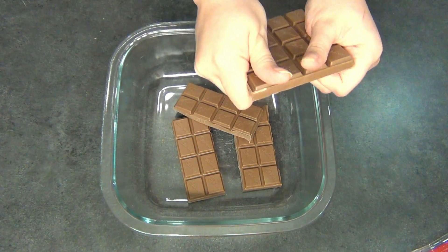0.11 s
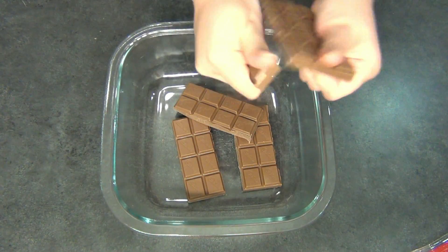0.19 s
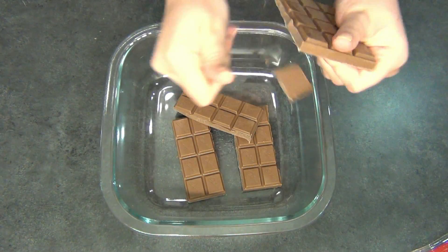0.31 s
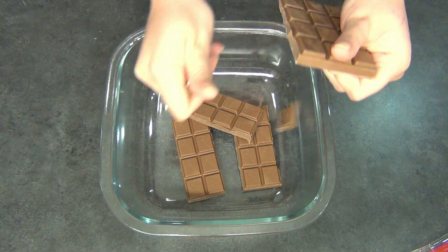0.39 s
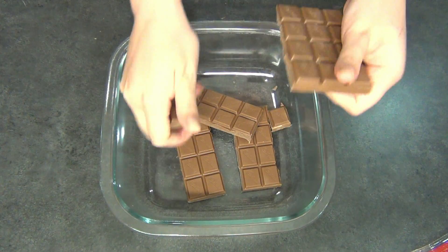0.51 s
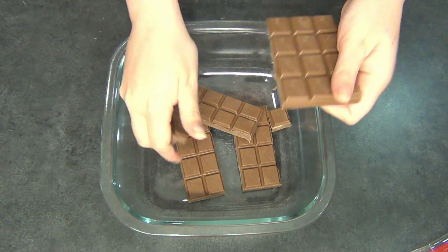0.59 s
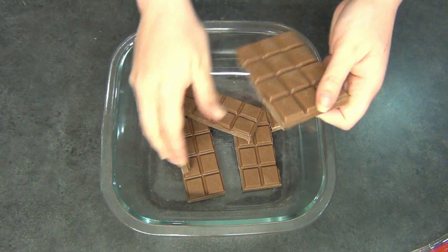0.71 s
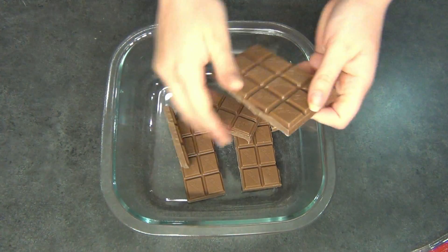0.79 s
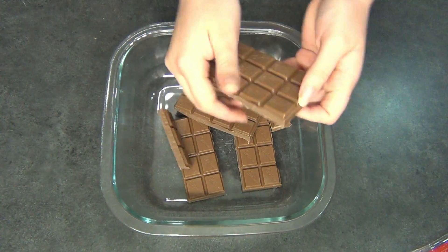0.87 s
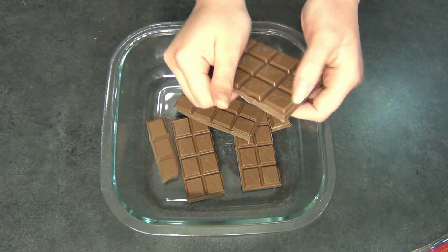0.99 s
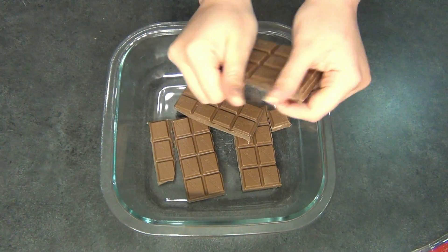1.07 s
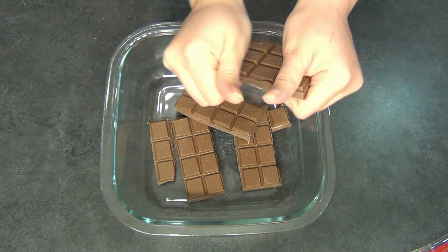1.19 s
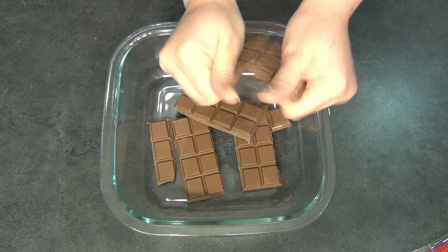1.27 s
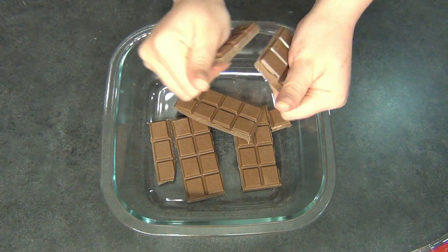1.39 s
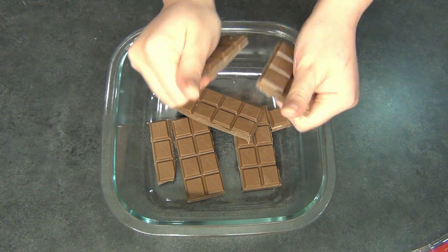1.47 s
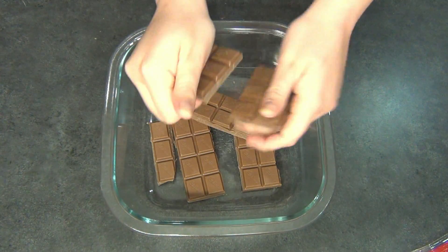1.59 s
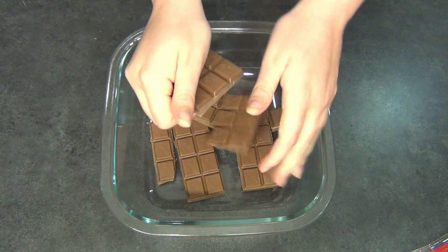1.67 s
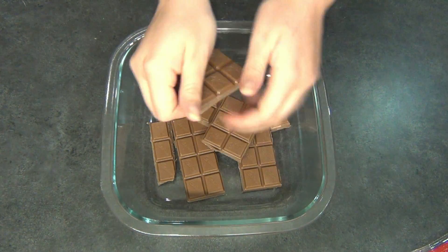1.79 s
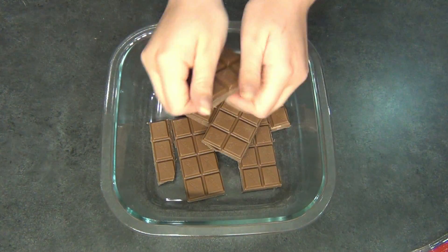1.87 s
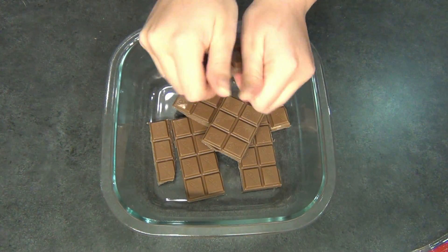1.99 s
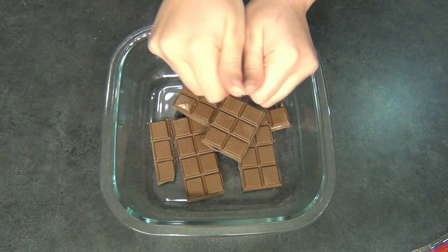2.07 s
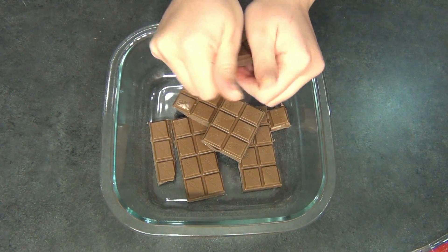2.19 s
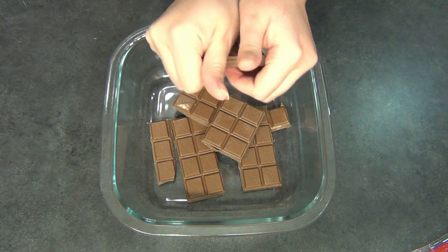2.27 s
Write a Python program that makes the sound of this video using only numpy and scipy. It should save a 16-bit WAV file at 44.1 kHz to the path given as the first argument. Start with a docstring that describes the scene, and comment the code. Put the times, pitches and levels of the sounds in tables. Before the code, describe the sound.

Chocolate snaps sharply by hand and pieces clatter into a glass dish.

```python
"""A kitchen counter, microphone close to a glass dish, hands snapping a chocolate bar above it.
Each break is a dry crack of a few milliseconds. The pieces drop, clatter, ring the glass and
slide to rest; crumbs tick, and the dish rocks and thumps on the counter. Further off, the hard
walls answer over soft room noise and a faint appliance hum."""
import sys
import numpy as np
from scipy import signal
from scipy.fft import rfft, irfft
from scipy.io import wavfile

SR = 44100
rng = np.random.default_rng(int(sys.argv[2]) if len(sys.argv) > 2 else 0)


def transcribe(u):
    """Save the signal u as a 16-bit wav file named by the first command-line argument.

    u: samples, shape (n,) or (channels, n), limited to [-1, 1]; the rate is SR.
    q: integer samples, one column per channel.
    """
    v = np.clip(np.atleast_2d(u).T, -1, 1)
    q = np.round(v * 32767).astype(np.int16)
    wavfile.write(sys.argv[1], SR, q)


N = 101430

# spectrum of the room noise: frequency_hz, relative_density_db
ROOM_TONE = [(25, -26), (50, -10), (100, -4.5), (180, -8), (320, 0), (500, -1.5), (1000, -8), (2000, -16.5),
             (4000, -19.5), (9000, -21), (16000, -16)]
# appliance hum: pitch_hz, level_db
HUM_TONES = [(100, -62.5), (170, -57), (200, -57.5), (303, -61.5)]
# kitchen reverberation by band: band_hz, level_db, t60_s, side_to_mid_db
REVERB_BANDS = [(101, -7.5, 1, -22), (262, 0.5, 0.63, -18), (726, 2.5, 0.92, -11), (1610, -1, 0.98, -11.5),
                (2780, -2.5, 0.69, -9.5), (4800, -5.5, 0.72, -6), (9200, -7.5, 0.58, -7.5),
                (14600, -14, 0.3, -50)]
# the dish rocking on the counter: start_s, level_db, pitch_hz, relative_boom_db
DISH_THUMPS = [(0.497, -25, 236, -17), (0.719, -29, 250, -40), (0.753, -18.5, 229, -19.5),
               (.772, -20, 210, -28), (.815, -22.5, 262, -41), (.859, -19, 221, -20),
               (.912, -28.5, 197, -40), (.96, -25, 208, -23), (1.02, -31, 264, -44),
               (1.071, -28.5, 223, -44), (1.107, -22.5, 202, -17), (1.145, -20.5, 236, -22),
               (1.191, -36, 284, -30), (1.759, -16, 210, -15.5), (1.794, -16, 200.5, -18.5),
               (1.838, -16.5, 228.5, -17.5)]
# crumbs and light touches: start_s, level_db, band_hz
CRUMB_TICKS = [(.304, 4.5, 2600), (.869, -13.5, 9000), (.921, -14, 8000), (.928, 0.5, 2180),
               (1.0005, -21.5, 11160), (1.137, -7, 6000), (1.147, -7.5, 6000), (2.013, -15, 12200)]
# pieces sliding to rest: start_s, fade_s, level_db, centre_hz
PIECE_SLIDES = [(.772, .13, -28.5, 3060), (1.815, 0.097, -26.5, 4520)]
# points at which the strength of each knock and snap is set: frequency_hz
STRENGTH_HZ = [500, 1000, 1600, 3000, 4700, 9000, 14000]
# modes of the glass dish: pitch_hz, damped_db, damped_t60_s, free_db, free_t60_s
DISH_MODES = [(833.3, -45, 0.016, -32, 0.42), (1513, -32, 0.025, -80, 0.57),
              (1614, -43.5, 0.076, -51, 0.38), (1733, -36.5, 0.028, -72, 0.37),
              (2348, -46.5, 0.098, -43.5, 0.23), (2857.3, -29.5, 0.024, -40, 0.51),
              (3058, -36, 0.046, -53, .4), (3918, -30.5, 0.034, -36.5, 0.13), (4515, -36, 0.055, -53, 0.3),
              (5100, -38.5, 0.083, -45.5, 0.37), (5620, -39.5, 0.024, -42.5, 0.31),
              (6150, -46, 0.15, -56, .4), (6620, -44, 0.036, -65, .33), (8550, -36.5, 0.069, -46, 0.23)]
# pieces hitting the dish and each other:
# start_s, free_ring_db, room_db, lead_hz, lead_db, then strength_db at each STRENGTH_HZ
PIECE_KNOCKS = [ (0.4677, -6, -2.5, 2365, -26, 6, 6, 18.8, 7.5, 9.5, -6, -13),
                (0.4772, -0.5, 1, 3960, -27, 2, -1.5, 2.7, 15, 15, 2.5, 6.5),
                (.5075, -16, -11, 3980, -24, 6, 4.5, 7, 8.5, 8, -2, -4),
                (.7350, -30, -6, 1635, -30.5, 10.5, 2, 14.2, 8, 8.5, -15, -18),
                (.7550, -25, 0.5, 1600, -40, 11.5, 5.5, 15, 16.5, 9, -3, -10),
                (0.7623, -22, -7, 4130, -17, 3, 11, -11, 14, 2, 8, -34),
                (.7668, -25, 0.5, 3180, -28, 10.5, 9.5, 16.6, 17, 9, 7.5, -3.5),
                (0.8576, -31, -2.5, 3980, -31.5, 15, 9, 13, 18.5, 11, -0.5, -26),
                (1.0945, -18.5, -3.5, 4950, -33, 13, 5.5, 15.3, 17, 11.5, 6.5, -10),
                (1.1295, -26, -17, 1670, -34, 6, -1, 11.6, -4.5, 1, -16, -18),
                (1.7581, -42, -1.5, 1554, -32, 15, 6, 17.9, 10.5, 6.5, 5.5, -2),
                (1.7621, -38, 0, 710, -37, 14.5, 1, 14, 12, 13.5, -6, -17),
                (1.7663, -42, -4.5, 487, -49, 11, 1, 20.1, 3.5, 0, 2, -14),
                (1.8079, -36, -2, 4400, -38, 3, -11, 1, 4, 12, -18, -13),
                (1.8122, -36, -6, 1670, -37, 1, 0, 6.6, 16, 14, -28, -19),
                (1.8225, -36, 4, 3400, -32, 8, 8, 9, 7, 11, 5.5, -9)]
# breaks of the bar:
# start_s, room_db, pan_db, counter_lag_s, ring_hz, ring_db, then strength_db at each STRENGTH_HZ
BAR_SNAPS = [(0.2403, 6, -1.5, .0014, 1430, -38.5, -5, 2, 10.5, 1.9, 4.9, 9.8, 9.4),
             (1.3629, -3.5, -1.4, .00115, 2590, -26, 8, 7, 9, 10.2, 7.5, 9.8, 10.7),
             (1.7874, 9, 1, .00065, 4950, -28, -10, -23, -3, 6.5, 10.7, 9.7, 3.4)]

TIME_S = np.arange(N) / SR
SIDE = np.array([[1], [-1]])  # left, right


def undb(db):
    """Decibels to gain."""
    return 10 ** (np.asarray(db) / 20)


def curve(hz, values, size=N):
    """Points joined on a log-frequency axis, for every bin of a spectrum."""
    return np.interp(np.log(np.fft.rfftfreq(size, 1 / SR) + 1), np.log(hz), values)


def bandpass(x, low_hz, high_hz):
    """Keep one band, with gentle slopes."""
    return signal.sosfilt(signal.butter(2, [low_hz, high_hz], "band", fs=SR, output="sos"), x)


def colour(x, strength_db, size=32768):
    """Causal filter with the given gains at STRENGTH_HZ, falling away in the bass."""
    bass_cut = np.minimum(np.fft.rfftfreq(size, 1 / SR) / 160 + 0.017, 1) ** 2
    cepstrum = irfft(np.log(undb(curve(STRENGTH_HZ, strength_db, size)) * bass_cut))
    cepstrum[1:size // 2] *= 2  # fold to minimum phase: nothing sounds ahead of the hit
    cepstrum[size // 2 + 1:] = 0
    impulse = irfft(np.exp(rfft(cepstrum)))[:size // 8]
    return signal.fftconvolve(x, impulse)[:len(x)]


def burst(rise_s, decay_s, size=4096):
    """Dense micro-cracks that swell and die away, even in spectrum and of unit energy."""
    t = TIME_S[:size]
    envelope = (1 - np.exp(-t / rise_s)) * np.exp(-t / decay_s)
    x = np.sign(rng.standard_normal(size)) * envelope
    for _ in range(2):  # flatten the spectrum, then restore the fade
        spectrum = rfft(x)
        x = irfft(spectrum / (np.abs(spectrum) + 1e-12)) * np.sqrt(envelope)
    return np.pad(x / np.sqrt(np.sum(x ** 2)), (0, N - size))


def ring(hz, db, t60_s, wave=np.sin):
    """One struck resonance."""
    t = TIME_S[:int(t60_s * 1.2 * SR)]
    tone = undb(db) * np.exp(-np.log(1000) * t / t60_s) * wave(2 * np.pi * hz * t)
    return np.pad(tone, (0, N - len(t)))


def pan(x, db):
    """Place a sound with the left louder than the right by db."""
    return x * undb(SIDE * db / 2)


def add(bus, x, start_s, pan_db, room_db):
    """Mix a sound into left, right and the feed to the room."""
    i = int(start_s * SR)
    bus[:2, i:] += pan(x[:N - i], pan_db)
    bus[2, i:] += x[:N - i] * undb(room_db)


def room_tone(air_db=-51.5, side_db=-15.5):
    """Soft room noise behind everything, with a faint appliance hum."""
    mid, side = irfft(rfft(rng.standard_normal((2, N))) * undb(curve(*np.array(ROOM_TONE).T)), N)
    air = undb(air_db) * (mid + undb(side_db) * side * SIDE) / mid.std()
    hum = sum(undb(db) * np.sin(2 * np.pi * (hz * TIME_S + rng.random())) for hz, db in HUM_TONES)
    return air + hum


def kitchen_walls(feed, delay_s=0.004, build_s=0.0046):
    """Diffuse reflections build up and fade, the treble first; the bass is alike on both sides."""
    t = np.maximum(TIME_S - delay_s, 0)
    bands_hz = [row[0] for row in REVERB_BANDS]
    noise = rfft(rng.standard_normal((2, N)))
    response = 0
    for share, (_, db, t60_s, side_db) in zip(np.eye(len(bands_hz)), REVERB_BANDS):
        envelope = (1 - np.exp(-t / build_s)) * np.exp(-np.log(1000) * t / t60_s)
        envelope /= np.sqrt(np.sum(envelope ** 2))
        mid, side = irfft(noise * curve(bands_hz, share), N)
        response += undb(db) * envelope * (mid + undb(side_db) * side * SIDE)
    return pan(signal.fftconvolve(feed[None], response, axes=1)[:, :N], db=0.3)


def dish_thumps(rise_s=0.0052, decay_s=0.0047, counter_hz=95, counter_decay_s=0.048):
    """The dish bumps the counter: a few low cycles, the worktop's boom and a little rumble."""
    bus = np.zeros((3, N))
    attack = 1 - np.exp(-TIME_S / rise_s)
    bump_shape = attack ** 2 * np.exp(-TIME_S / decay_s)
    boom_shape = attack * np.exp(-TIME_S / counter_decay_s)
    for start_s, db, hz, boom_db in DISH_THUMPS:
        bump = bump_shape / bump_shape.max() * np.sin(2 * np.pi * hz * TIME_S)
        rumble = bandpass(rng.standard_normal(N), 150, 600)
        boom = np.sin(2 * np.pi * counter_hz * TIME_S) + undb(3.5) * rumble / rumble.std()
        thump = bump + undb(boom_db) * boom_shape * boom
        add(bus, undb(db) * thump, start_s, pan_db=3.5, room_db=-1.5)
    return bus


def crumb_ticks():
    """Crumbs land and edges graze each other, with a faint rattle."""
    bus = np.zeros((3, N))
    for start_s, db, hz in CRUMB_TICKS:
        touch = burst(rise_s=0.00072, decay_s=0.00061)
        rattle = undb(-5) * burst(rise_s=0.003, decay_s=0.0047)
        tick = bandpass(touch + rattle, hz / 1.8, hz * 1.28)
        add(bus, undb(db) * tick, start_s, pan_db=0, room_db=4.5)
    return bus


def piece_slides(catches_per_s=610, band_ratio=1.144):
    """Tiny catches of chocolate on glass, fading as the piece settles."""
    bus = np.zeros((3, N))
    for start_s, fade_s, db, hz in PIECE_SLIDES:
        catches = (rng.random(N) < catches_per_s / SR) * rng.standard_normal(N)
        scrape = bandpass(catches, hz / band_ratio, hz * band_ratio)
        slide = scrape / scrape.std() * np.exp(-TIME_S / fade_s)
        add(bus, undb(db) * slide, start_s, pan_db=0, room_db=-0.5)
    return bus


def piece_knocks(high_count=14, high_span_hz=(5640, 14320), detune=0.01244, scatter_db=2.5):
    """Pieces strike the glass: its modes are mostly damped and detuned by chocolate, partly free."""
    bus = np.zeros((3, N))
    high_hz = np.interp(np.arange(high_count) + rng.random(high_count), [0, high_count], high_span_hz)
    modes = list(DISH_MODES) + [(hz, -41, 0.067, -51, 0.36) for hz in high_hz]
    free = sum((-1) ** k * ring(hz, db, t60_s) for k, (hz, _, _, db, t60_s) in enumerate(modes))
    for start_s, free_ring_db, room_db, lead_hz, lead_db, *strength_db in PIECE_KNOCKS:
        pitch_draw, level_draw = rng.standard_normal((len(modes), 2)).T
        damped = 0
        for k, (hz, db, t60_s, _, _) in enumerate(modes):
            loaded_hz = hz * (1 + detune * pitch_draw[k])
            damped += (-1) ** k * ring(loaded_hz, db + scatter_db * level_draw[k], t60_s)
        lead = ring(lead_hz, lead_db, t60_s=0.035, wave=np.cos)  # this knock's leading resonance
        contact = undb(-4) * burst(rise_s=0.0001, decay_s=0.0012)
        rattle = undb(-10.5) * burst(rise_s=0.0018, decay_s=0.0096)
        knock = contact + rattle + lead + damped + undb(free_ring_db) * free
        add(bus, colour(knock, strength_db), start_s, pan_db=1, room_db=room_db)
    return bus


def bar_snaps(reflection_db=-6):
    """A fracture crosses the bar in about 3 ms; the halves ring and the counter mirrors the crack."""
    bus = np.zeros((3, N))
    for start_s, room_db, pan_db, counter_lag_s, ring_hz, ring_db, *strength_db in BAR_SNAPS:
        crack = burst(rise_s=0.00013, decay_s=0.0025)
        reflection = undb(reflection_db) * np.roll(crack, int(counter_lag_s * SR))
        halves = ring(ring_hz, ring_db, t60_s=0.019)
        add(bus, colour(crack + reflection + halves, strength_db), start_s, pan_db, room_db)
    return bus


def microphone_pair(x, lag_s=3e-6):
    """Close sound reaches the left microphone a few microseconds before the right."""
    phase = np.pi * np.fft.rfftfreq(N, 1 / SR) * lag_s * SIDE
    return irfft(rfft(x) * np.exp(1j * phase), N)


def scene():
    """Chocolate and dish up close, the walls further off, room tone behind."""
    bus = bar_snaps() + piece_knocks() + piece_slides() + crumb_ticks() + dish_thumps()
    return microphone_pair(bus[:2]) + kitchen_walls(bus[2]) + room_tone()


def record(dry):
    """The recorder rounds the highest peaks, softens the highest treble and cuts the top."""
    ceiling, roll_off_hz, top_hz = 0.72, 13900, 16200
    rounded = ceiling * np.tanh(dry / ceiling)
    softened = signal.sosfilt(signal.butter(3, roll_off_hz, fs=SR, output="sos"), rounded)
    return signal.sosfilt(signal.ellip(8, 0.2, 70, top_hz, fs=SR, output="sos"), softened)


dry = scene()
out = record(dry)
transcribe(out)
```